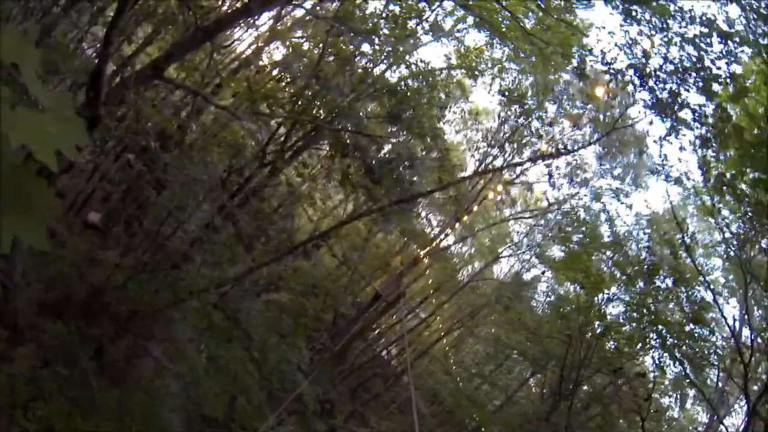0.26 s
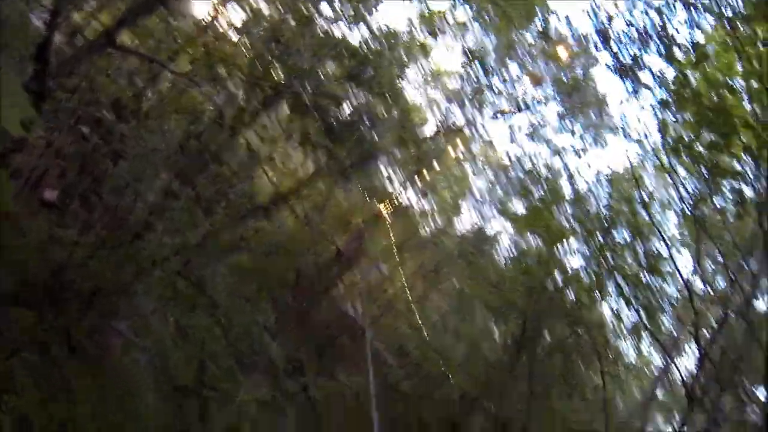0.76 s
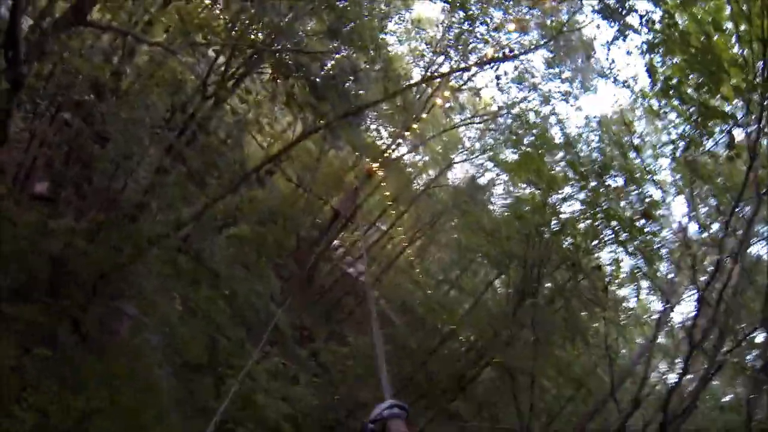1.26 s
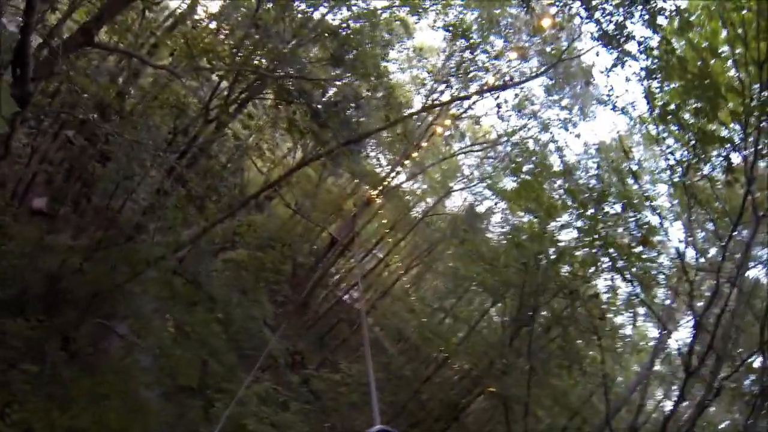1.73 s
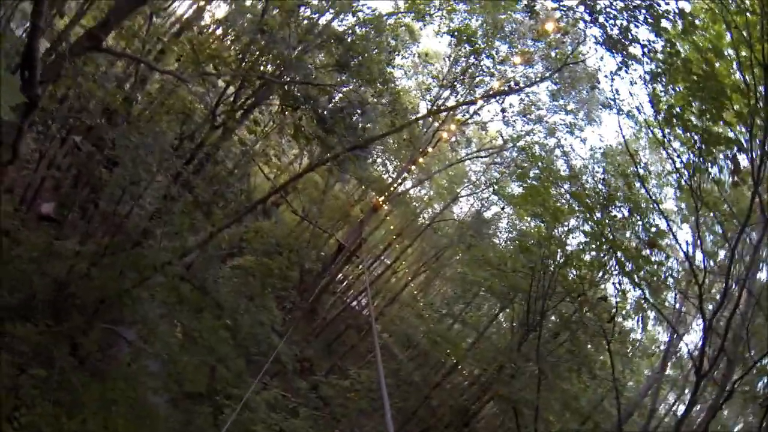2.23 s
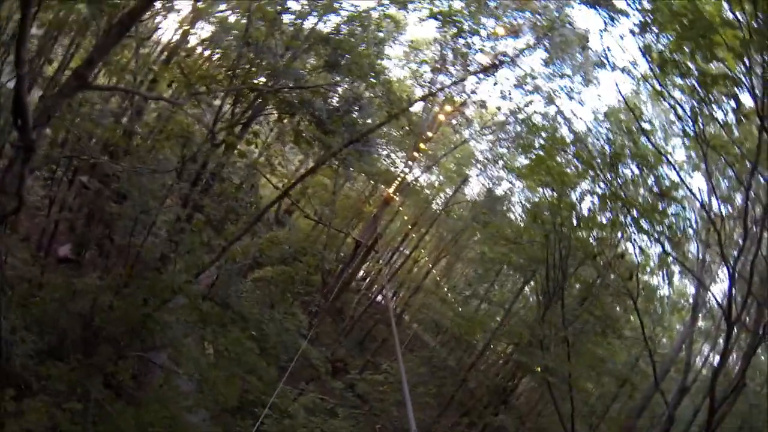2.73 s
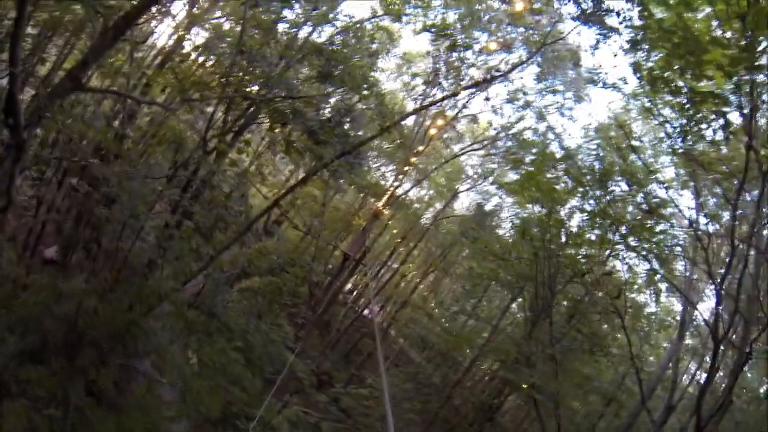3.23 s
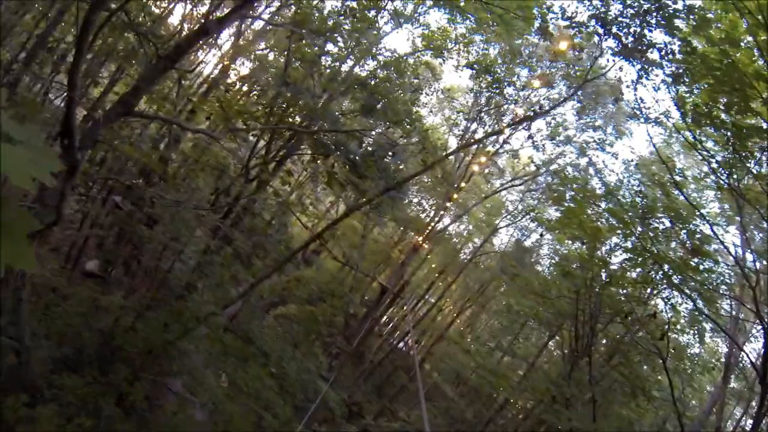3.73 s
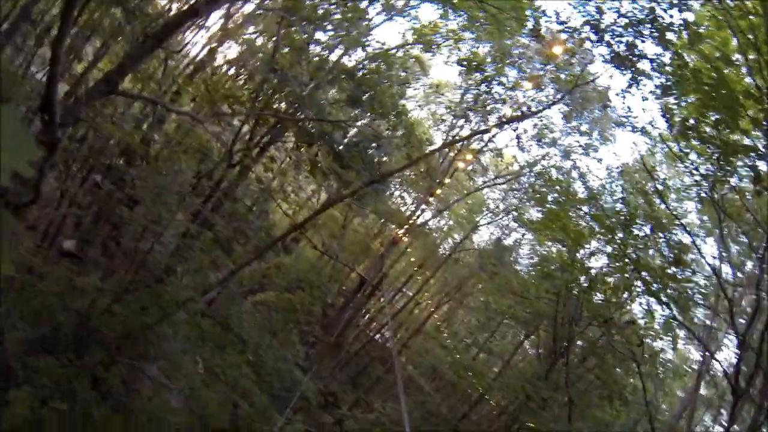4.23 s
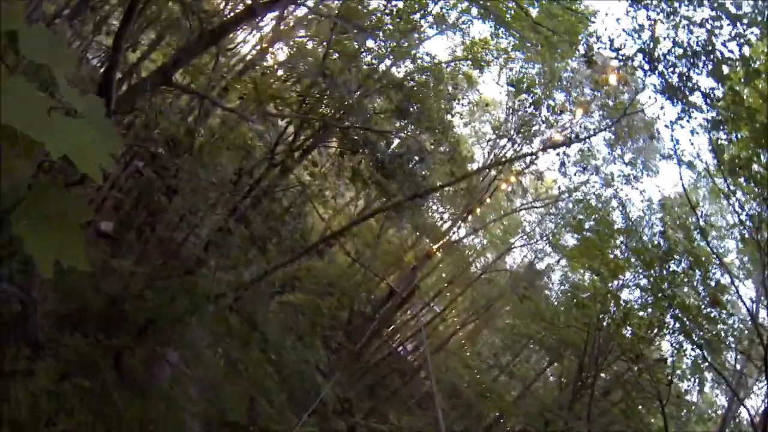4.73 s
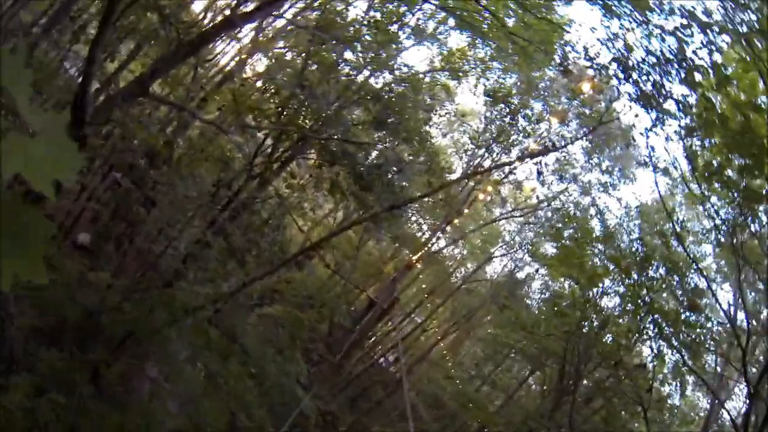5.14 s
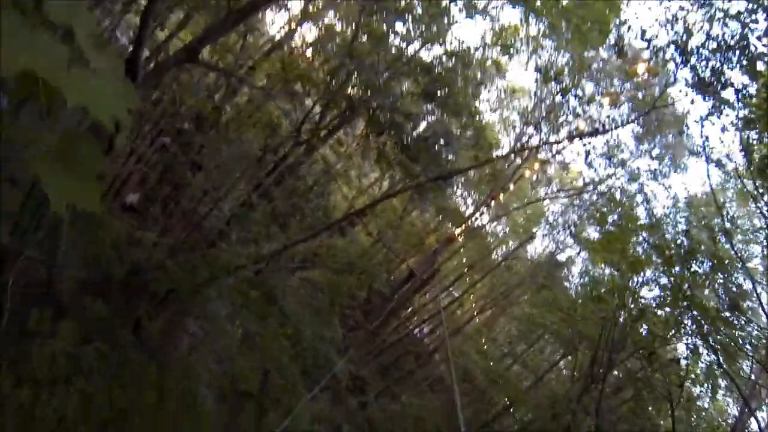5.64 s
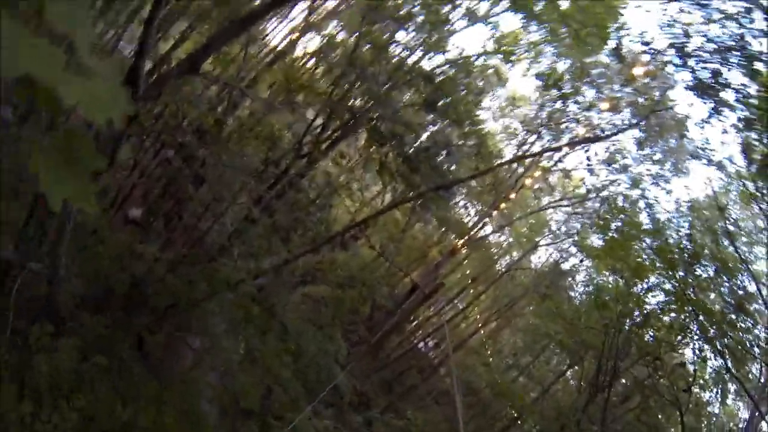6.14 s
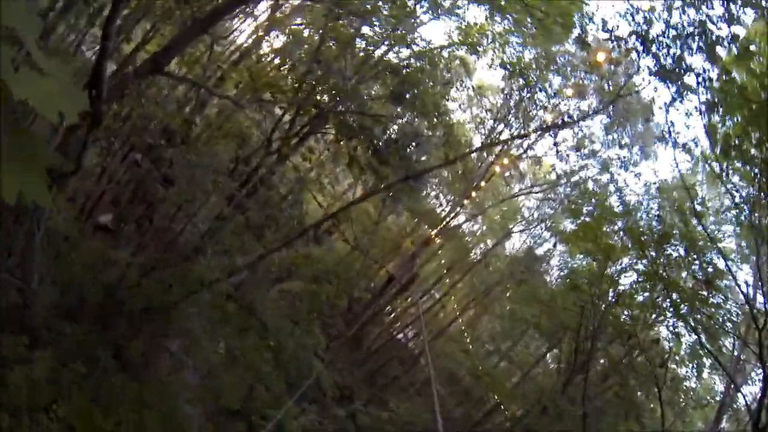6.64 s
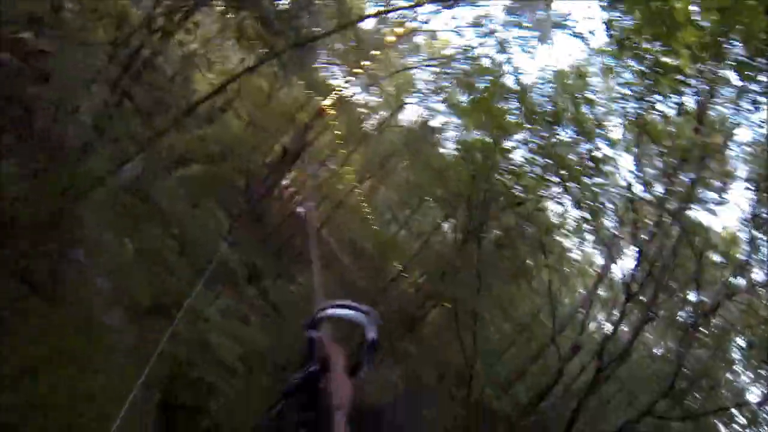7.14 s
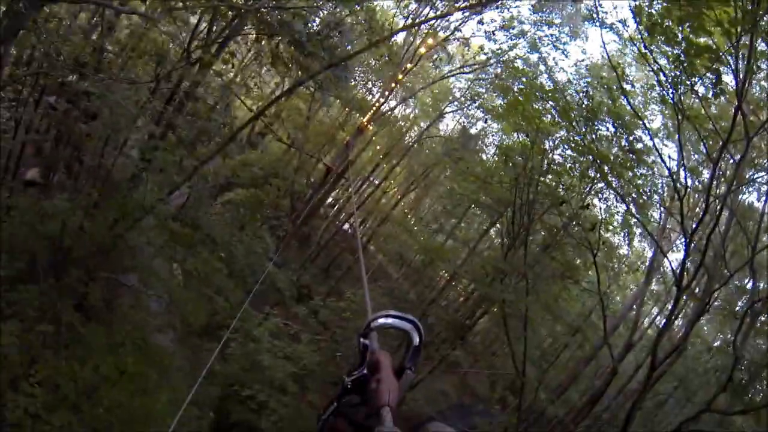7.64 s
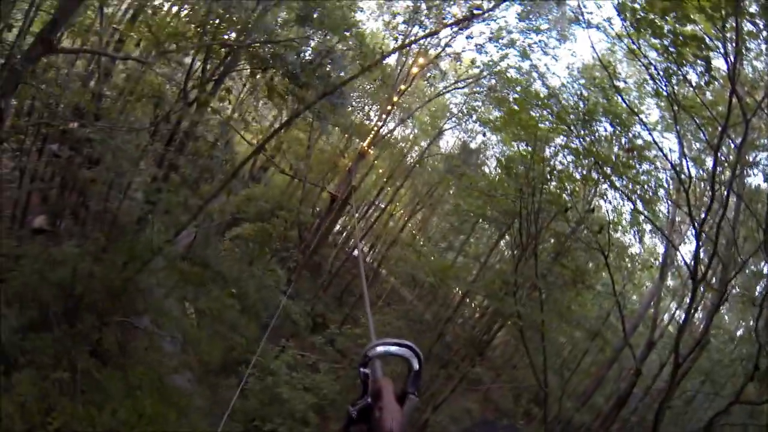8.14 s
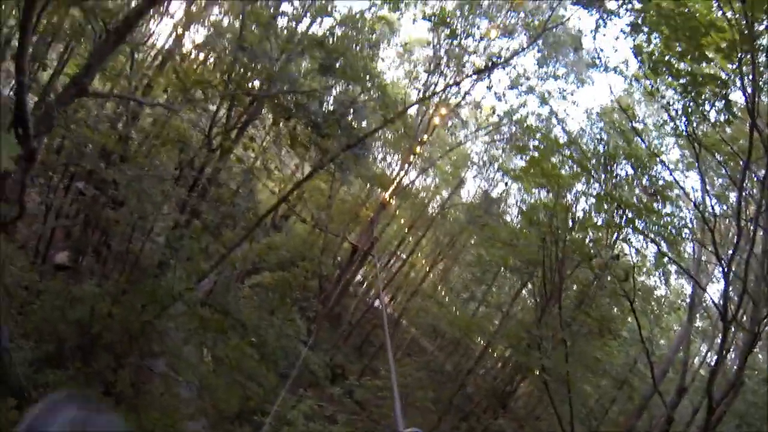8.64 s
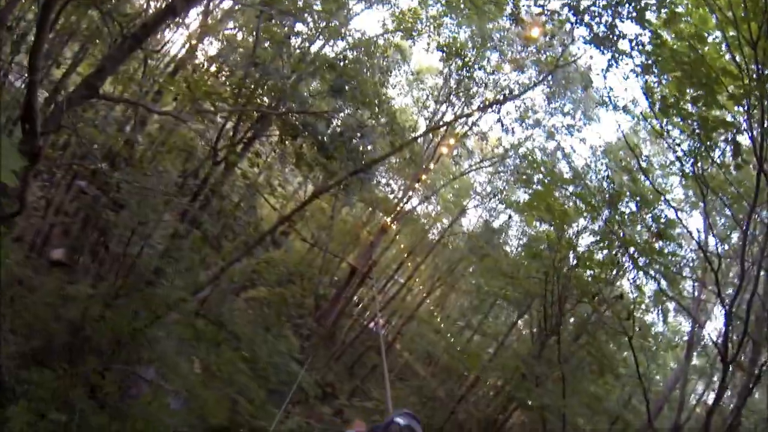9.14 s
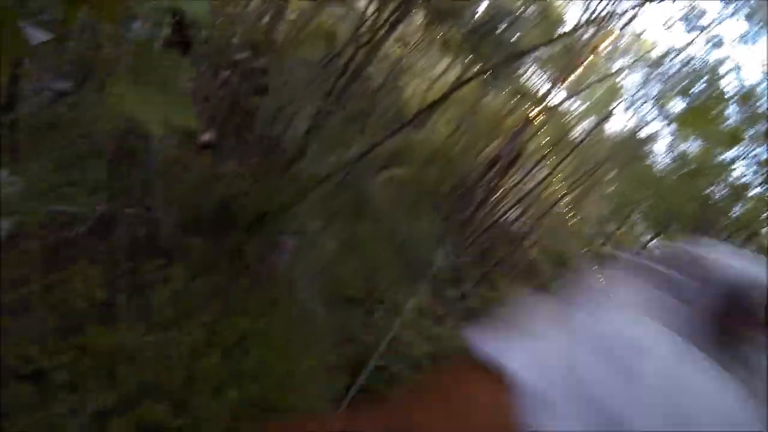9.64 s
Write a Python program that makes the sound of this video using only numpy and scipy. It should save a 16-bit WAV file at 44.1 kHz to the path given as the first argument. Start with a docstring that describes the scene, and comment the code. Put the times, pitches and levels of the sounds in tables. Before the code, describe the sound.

Heard from the rider's own microphone outdoors, low wind buffets in bursts beneath a soft rush of air. Steel wheels whir and hiss continuously on the cable, growing somewhat stronger after the first few seconds. Loose hardware ticks, pings and knocks, sparse in the middle; a short scraping tone rises before seven seconds, and sharp clicks finally crowd into a rattling cluster.

```python
"""A zip-line trolley whirs and hisses along a steel cable amid metallic clicks and rumbling wind.
Random wheel impacts excite two trolley resonances; fine grit and rough tones make the cable hiss and sing.
Hanging hardware clicks, pings and jingles as modal contacts; jolts thump the rig, faint whistles glide,
and airflow past the rider's microphone is shaped noise: gusty low eddies under a smooth rush."""
import sys
import numpy as np
from scipy import signal
from scipy.fft import rfft, irfft, next_fast_len
from scipy.io import wavfile
from scipy.ndimage import uniform_filter1d

SR = 44100
rng = np.random.default_rng(int(sys.argv[2]) if len(sys.argv) > 2 else 0)


def pcm_store(signal):
    """Save signal as 16-bit PCM."""
    levels = np.round(np.clip(np.atleast_2d(signal), -1, 1) * 32767)
    wavfile.write(sys.argv[1], SR, levels.astype(np.int16).T)


N = 436149
T = np.arange(N) / SR
LEAD_S = 0.003  # soft lead-in before the peak of a click

# wheel flange rubbing the cable: (time [s], pitch [Hz], rub level [dB], added whir [dB])
RUB = [(6.15, 3030, -99, 2), (6.3, 3205, -76, 2.5), (6.68, 3350, -72.5, -2.5), (6.79, 3500, -67, 8.5),
       (6.85, 3580, -98, 1), (6.95, 3480, -100, -1)]
# metal hardware resonances: (frequency [Hz], nominal width [Hz], relative level [dB])
HARDWARE = [(1530, 390, -0.5), (2178, 88, 12), (2604, 160, 14), (2996, 200, 13), (3240, 160, 5),
            (3660, 110, 9.5), (3950, 190, -0.5), (4960, 190, 1), (5510, 320, 4), (6460, 210, 2.5),
            (7060, 290, 2.5), (8320, 620, -0.5), (9630, 930, 0.5), (11700, 330, -14), (12400, 500, -6)]


def undb(db):
    """Decibels to amplitude gain."""
    return 10 ** (np.asarray(db) / 20)


def unit(x):
    """Scale to rms 1."""
    return x / np.sqrt(np.mean(x ** 2))


def curves(table):
    """Interpolate each column after the first over time."""
    time_s, *columns = np.transpose(table)
    return [np.interp(T, time_s, column) for column in columns]


def walk(rate_hz):
    """Smooth random wander, spread near 1, from twice-averaged random steps."""
    step = int(SR / rate_hz)
    steps = np.repeat(rng.standard_normal(N // step + 1), step)
    smooth = uniform_filter1d(uniform_filter1d(steps, step), step)
    return 1.39 * smooth[:N]


def colour(x, points):
    """Filter by a spectrum of (frequency [Hz], gain [dB]), linear in log frequency."""
    hz, db = np.transpose(points)
    size = next_fast_len(len(x))
    bin_hz = np.arange(size // 2 + 1) * SR / size
    gain = undb(np.interp(np.log(bin_hz + 1), np.log(hz), db))
    return irfft(rfft(x, size) * gain, size)[:len(x)]


def resonate(x, hz, width_hz):
    """One resonance, gain 1 at its centre."""
    b, a = signal.iirpeak(hz, hz / width_hz, fs=SR)
    return signal.lfilter(b, a, x)


def band(x, lo_hz, hi_hz, order=2):
    """Causal band-pass."""
    sos = signal.butter(N=order, Wn=[lo_hz, hi_hz], btype="band", fs=SR, output="sos")
    return signal.sosfilt(sos, x)


def patter(rate_per_s, spread_db):
    """Tiny impacts of random sign at random times, mostly weak and a few strong."""
    hit = rng.random(N) < rate_per_s / SR
    sign = rng.choice([-1, 1], N)
    strength_db = spread_db * np.minimum(rng.exponential(size=N), 4)
    return hit * sign * undb(strength_db)


def rough_tone(hz, width_hz):
    """A tone whose phase and strength friction keeps scrambling: noise-modulated quadrature carriers."""
    low_pass = signal.butter(2, width_hz / 2, fs=SR, output="sos")
    slow = signal.sosfilt(low_pass, rng.standard_normal((2, N)))
    phase = 2 * np.pi * np.cumsum(hz) / SR
    return unit(slow[0] * np.cos(phase) + slow[1] * np.sin(phase))


def singing(modes):
    """Rough tones summed over modes of (frequency [Hz], width [Hz], level [dB])."""
    return sum(undb(db) * rough_tone(np.full(N, hz), width_hz) for hz, width_hz, db in modes)


def struck_mode(hz, t60_s):
    """One struck steel mode: a pure note with exponential decay."""
    age = np.arange(SR // 3) / SR
    return np.sin(2 * np.pi * hz * age) * undb(-60 * age / t60_s)


def add(out, start_s, sound):
    """Mix a sound in at a time."""
    start = int(start_s * SR)
    out[start:start + len(sound)] += sound


def fade(start_s, attack_s, t60_s):
    """Envelope from a set time: a quick rise, then exponential decay."""
    out, age = np.zeros(N + 2 * SR), np.arange(SR) / SR
    add(out, start_s, (1 - np.exp(-age / attack_s)) * undb(-60 * age / t60_s))
    return out[:N]


def trolley(whir_db):
    """Wheels run over the wire strands; dense random impacts ring the trolley body."""
    strands = patter(rate_per_s=4500, spread_db=1.6)
    pressure_db = curves(RUB)[2]
    return trolley_body(strands) * undb(whir_db + pressure_db + 1.1 * walk(14))


def trolley_body(push):
    """The trolley's two main resonances, each a peak filter applied twice, in opposite signs."""
    # rolling trolley resonances: (frequency [Hz], width per pass [Hz], relative level [dB])
    whir_modes = [(1352, 240, 1.5), (1573, 248, -0.5)]
    body = 0
    for k, (hz, width_hz, db) in enumerate(whir_modes):
        once = resonate(push, hz, width_hz)
        body = body + (-1) ** k * undb(db) * resonate(once, hz, width_hz)
    return unit(body)


def cable(hiss_db):
    """Steel on steel: impacts hiss and ring the hardware; rough tones sing and a flange rubs."""
    # hiss spectrum: (frequency [Hz], relative level [dB])
    hiss_spectrum = [(1120, -36), (1900, -23), (2050, 1.5), (2560, -2), (3180, 0.5), (3440, -2),
                     (4140, -5.5), (4840, -7.5), (5430, -10.5), (7370, -11), (9420, -15.5), (12200, -18.5),
                     (14300, -31)]
    grit = patter(rate_per_s=9000, spread_db=3.0)
    hiss = unit(colour(grit, [(900, -31)] + list(hiss_spectrum)))

    tremor = patter(rate_per_s=3200, spread_db=5.0)
    metal = unit(sum(undb(db) * resonate(tremor, hz, width_hz * 0.66) for hz, width_hz, db in HARDWARE))
    metal = unit(colour(metal, [(1500, 7.0), (2800, -8.0), (6500, -24), (9000, -16), (14000, -40)]))
    friction = (undb(-2.5) * hiss + undb(-8.0) * metal) * undb(hiss_db + 0.5 * walk(10))
    return friction + cable_song() + flange_rub()


def cable_song():
    """Steel resonances sing under the wheels as two sets of rough tones, with a thin steady top note."""
    # singing levels: (time [s], first set gain [dB], second set gain [dB])
    sing_levels = [(0, -77.5, -80), (1.2, -77.5, -85), (1.7, -77.5, -85), (3, -79, -94), (5.5, -81, -90),
                   (7.5, -78.5, -87.5), (8.6, -75, -82), (9.89, -74, -78.5)]
    # steel resonances, two interleaved sets with their own levels: (frequency [Hz], width [Hz], relative level
    # [dB])
    first_set = [(5395, 890, 0), (7350, 1100, -6)]
    second_set = [(3630, 1300, 3.5), (6280, 670, 1.5), (8700, 550, -8.5)]
    first_db, second_db = curves(sing_levels)
    song = singing(first_set) * undb(first_db) + singing(second_set) * undb(second_db)
    top_note = rough_tone(np.full(N, 11300), width_hz=75)
    return song + top_note * undb(-97.5)


def flange_rub():
    """A wheel flange rubs the cable: a gliding rough tone plus fixed upper modes of the wheel."""
    # upper modes of the rubbed wheel: (frequency [Hz], width [Hz], relative level [dB])
    rub_modes = [(5280, 490, -6), (7200, 390, -7), (9750, 320, -15)]
    full_db = -75.5  # a harder rub no longer strengthens the upper modes
    rub_hz, rub_db, _ = curves(RUB)
    glide = rough_tone(rub_hz, width_hz=620) * undb(rub_db)
    return glide + singing(rub_modes) * undb(np.minimum(rub_db, full_db))


def hardware():
    """Carabiners and links click, rebound, ping and shiver; loose links jingle towards the end."""
    # clicks: (time [s], level [dB], clack over ring [dB], ring pitch [Hz], chatter t60 [s],
    #          knock relative to level [dB], sparkle relative to clack [dB])
    clicks = [(.1288, -45.5, -1, 3180, 0.015, 0, -3.5), (0.4152, -49, 2, 3940, .014, -8, -13),
              (.75, -43.5, 8, 3640, 0.031, 1.5, -7.5), (.7689, -53, 3, 3190, 0.018, 3, -9),
              (0.8385, -56, -18, 3220, 0.02, 10.5, -10), (.87, -64, -18, 3050, .025, 5, -10),
              (0.972, -57.5, -0.5, 3300, 0.032, 10, -10), (.981, -60, -4, 3100, 0.038, 7, -7),
              (1.1038, -49.5, -2, 3000, 0.02, -7, -12), (1.444, -60, -8, 3180, .028, -3, -12),
              (1.8278, -58.5, -11, 2950, 0.026, 2, -4), (2.042, -59, -13, 3050, .022, 0, -12),
              (2.1103, -53.5, -8, 2980, 0.019, -5, -9), (2.193, -59, -11, 2890, 0.022, 3, -8),
              (2.369, -47, -5.5, 2980, 0.015, -1, -10), (2.557, -52.5, -3, 2960, 0.019, 6, -5),
              (2.89, -56.5, -3, 3000, .028, -2, -11), (3.0585, -53.5, -2, 2560, 0.022, -6, -6),
              (3.131, -45, -1.5, 2900, 0.022, -1, -6), (3.1335, -37, -2.5, 2920, 0.022, 1.5, -12),
              (3.141, -46.5, -5, 2850, 0.028, 2, -7), (3.155, -53, -3, 2500, .02, 5, -7),
              (3.3695, -52.5, -6, 3300, 0.013, 12, -14), (3.707, -45.5, -4.5, 3000, 0.021, -2, -11),
              (3.936, -54.5, -2, 3180, 0.033, -1, -8), (4.105, -49.5, -2, 3520, 0.019, -3, -10),
              (4.2306, -59.5, -4, 3050, 0.024, -2, -8), (4.2688, -56, -6, 3300, .02, -2, -9),
              (4.532, -55, -7.5, 3340, 0.027, 4, -10), (4.553, -47, 7, 3100, 0.031, -0.5, -5),
              (4.575, -60, 4, 3060, .025, -6, -7), (4.818, -51.5, 6.5, 3020, .03, 4, -9),
              (4.832, -59.5, -3, 3060, .02, -1, -1.5), (4.9322, -59, 0, 3300, 0.014, 9, -10),
              (4.9681, -61, 7, 3300, 0.016, -4, -8), (6.0042, -52.5, -13, 3690, .012, -10, -11),
              (6.2959, -60.5, -8, 3200, .02, -2, -12), (6.596, -59.5, -11, 3200, .028, -8, -9),
              (6.648, -60, 2, 3400, .02, -2, -9), (6.933, -56.5, 8, 3450, .034, 0, -9),
              (6.946, -53.5, -16, 3200, 0.02, 2, -10), (7.5255, -53.5, -7, 3370, 0.013, 10, -12),
              (7.784, -56.5, 2, 3700, 0.027, -2, -16), (7.834, -54, -5, 3100, 0.022, -2, -8),
              (7.848, -43.5, 8.5, 2620, .036, -4.5, -13), (7.859, -57, 18, 3100, 0.021, -6, -17),
              (7.8837, -36, 3.5, 2540, 0.012, -3, -9), (8.028, -57, -7, 3250, 0.03, 7, -15),
              (8.118, -38.5, 3, 3750, 0.012, 0, -20), (8.1434, -54.5, 1, 2980, .02, 9, -13),
              (8.195, -55.5, 0, 3930, .02, 9, -8), (8.5375, -56.5, -9, 3500, .035, -6, -5),
              (8.5562, -39.5, -4, 3400, 0.023, -6, -9), (8.575, -54.5, -5, 3250, .04, 3, -9),
              (8.6123, -52, 1, 2640, 0.018, -2, -8), (8.853, -54, -9, 4150, .02, -4, -9),
              (9.059, -49, 2, 3305, 0.023, 0, -6), (9.172, -59, 12.5, 3300, .018, -1, -8),
              (9.2005, -54.5, 3, 2980, 0.026, 3, -10), (9.3, -53, 4, 2800, .014, -2, -7),
              (9.3059, -50.5, 5, 3220, .02, 2, -9), (9.329, -53, 3, 3500, .014, 0, -4),
              (9.356, -49.5, 5, 2570, .022, 0, -13), (9.3827, -47.5, 4, 3380, 0.0098, -2, -8),
              (9.4324, -41.5, -0.5, 3380, 0.024, -3, -13), (9.4687, -50.5, -8, 3250, .02, 0, -6),
              (9.4997, -50, 5, 3600, .02, 0, -5), (9.5035, -39.5, 4, 3730, 0.017, -1.5, -6),
              (9.5106, -40, 4.5, 3560, 0.025, -4, -11), (9.6256, -51, 1, 3700, .024, -2, -10),
              (9.638, -46, 12, 3740, 0.021, -4, -7), (9.674, -51, 5, 2830, 0.024, -6, -9),
              (9.7165, -60, -6, 2740, .018, -4, -11), (9.7509, -61, 0, 4100, .022, -6, -7),
              (9.7837, -50, 2, 2960, 0.021, -1, -15), (9.7932, -46.5, -7, 2940, 0.016, 4, -7)]
    # added ringing notes, most with the clicks, a few as faint ticks:
    # (time [s], pitch [Hz], level [dB], t60 [s])
    pings = [(.75, 5416, -41, 0.035), (3.3705, 5400, -49.5, .018), (0.416, 3820, -48.5, .022),
             (.87, 3070, -52, 0.041), (3.144, 3020, -38, .03), (3.229, 3070, -59, .04),
             (5.779, 3000, -61, .04), (7.849, 6430, -42, 0.037), (8.557, 11400, -39, 0.017),
             (8.557, 3530, -41, .035), (9.5112, 11200, -35, 0.021), (9.638, 4780, -41.5, 0.033),
             (9.7935, 6400, -54, .065), (6.005, 3700, -50, .02), (9.434, 3400, -44, .028),
             (9.4695, 3270, -44, .032)]
    # freely hanging carabiner modes: (frequency [Hz], relative level [dB], t60 [s])
    carabiner_modes = [(3130, -5.5, 0.096), (6340, -0.5, 0.085), (8500, -8, 0.062), (12460, -2, 0.032)]
    # blows on that carabiner: (time [s], level [dB])
    carabiner_blows = [(4.554, -50), (4.818, -57)]
    # loose-part notes: (time [s], pitch [Hz], level [dB], t60 [s])
    shivers = [(.88, 3080, -69, 0.64), (2.04, 3060, -69, 0.58), (6.94, 3030, -68, .8),
               (9.515, 11270, -69, .26)]
    # jingling spells: (start [s], length [s], touches per second [1/s], base level [dB])
    jingles = [(9.3, .48, 90, -64.5)]
    rebound_s, rebound_db = 0.016, -23.5  # mean delay; level against the click

    out = np.zeros(N + SR)
    for time_s, db, *tone in clicks:
        add(out, time_s - LEAD_S, click(db, *tone))
        add(out, time_s + rebound_s * (0.5 + rng.random()), click(db + rebound_db, *tone))
    for time_s, hz, db, t60_s in pings:
        add(out, time_s, undb(db) * struck_mode(hz, t60_s))
    for time_s, db in carabiner_blows:
        for hz, mode_db, t60_s in carabiner_modes:
            add(out, time_s, undb(db + mode_db) * struck_mode(hz, t60_s))

    mix = out[:N]
    for time_s, hz, db, t60_s in shivers:
        envelope = undb(db) * fade(time_s, attack_s=0.014, t60_s=t60_s)
        mix = mix + envelope * rough_tone(np.full(N, hz), width_hz=100)
    return mix + sum(jingle(*row) for row in jingles)


def click(db, bright_db, ring_hz, t60_s, knock_db, sparkle_db):
    """Two metal parts meet with a soft onset and chatter briefly; each contact favours other modes."""
    t = np.arange(SR // 3) / SR - LEAD_S
    age = np.maximum(t, 0)
    lead_in = undb(-33.0 + 16 * np.minimum(t, 0) / LEAD_S) * (t < 0)
    decay = undb(-60 * age / max(t60_s, 0.005)) + undb(-39.0 - 60 * age / 0.35)
    envelope = lead_in + decay * (1 - np.exp(-age / 0.00025))

    # uneven tiny impacts ring the modes and also crack directly into the air
    grain = undb(3 * np.repeat(rng.standard_normal(len(t)), SR // 2000)[:len(t)])
    chatter, crack = rng.standard_normal((2, len(t))) * grain * envelope
    luck = rng.standard_normal(len(HARDWARE))
    modes = 0
    for k, (hz, width_hz, mode_db) in enumerate(HARDWARE):
        gain = (-1) ** k * undb(mode_db + 4.2 * luck[k])
        modes = modes + gain * resonate(chatter, hz, width_hz * 0.8)
    sound = modes + undb(-5.0) * crack

    knock = unit(band(sound, 1370, 1690)) + undb(-8) * unit(band(crack, 490, 1320))
    ring_band = unit(band(sound, 2620, 3800))
    ring = unit(ring_band + undb(4.0) * unit(resonate(chatter, ring_hz, 160)))
    clack = unit(band(sound, 4190, 8140, order=5))
    sparkle = unit(band(sound, 9100, 14000))

    # brightness moves energy from the ring to the clack and sparkle
    ring_db, clack_db = -bright_db / 2, bright_db / 2
    mix = undb(knock_db) * knock + undb(ring_db) * ring
    mix += undb(clack_db - 0.5) * clack + undb(clack_db + sparkle_db) * sparkle

    # thin carabiner ring, near 3014 Hz, growing less than the blow does
    ring_on_hz = 3014 * (1 + 0.0088 * luck[0])
    ring_on = np.sin(2 * np.pi * ring_on_hz * age) * undb(-60 * age / 0.16)
    ring_on_db = -40.0 + 0.52 * (db + ring_db)
    return mix * undb(db) * np.sqrt(np.mean(envelope ** 2)) + ring_on * undb(ring_on_db)


def jingle(start_s, length_s, rate_per_s, db):
    """Loose links brush: many faint touches, a few firmer, each with its own colour and note."""
    out = np.zeros(N + SR)
    for when, strength, pitch, hardness, note in rng.random((int(length_s * rate_per_s), 5)):
        time_s = start_s + length_s * when
        touch_db = db + 8 * strength ** 2
        touch = click(touch_db, bright_db=-9 + 13 * hardness, ring_hz=2600 + 2200 * pitch,
                      t60_s=0.014, knock_db=-5.0, sparkle_db=-11)
        add(out, time_s, touch)
        link_hz = 2800 * 2 ** (2 * note)  # within two octaves
        add(out, time_s, undb(touch_db - 2) * struck_mode(link_hz, t60_s=0.037))
    return out[:N]


def jolts():
    """Jolts thump the rig as shaped noise, make it bounce at a low note and ring the trolley body."""
    # jolts: (time [s], rig thump level [dB], thump t60 [s], trolley ring level [dB])
    jolt_events = [(0.75, -50, 0.037, -39), (2.042, -57, 0.036, -45), (3.134, -44, 0.052, -38),
                   (3.37, -49, 0.045, -39), (4.107, -50, .03, -47), (4.818, -51.5, 0.067, -41),
                   (7.883, -53, 0.027, -48), (8.119, -64, 0.025, -52), (8.195, -49, 0.049, -53),
                   (8.576, -63, .035, -39), (9.504, -58, 0.045, -51)]
    # thump spectrum: (frequency [Hz], relative level [dB])
    thump_spectrum = [(40, -1), (100, 7.5), (170, 3), (300, -31), (450, -6.5), (700, -2.5), (950, -27),
                      (2000, -38)]
    bounce_hz, bounce_t60_s, bounce_db = 79.6, 0.32, 2.5  # level against the thump
    force, shake, bounce = np.zeros((3, N))
    for time_s, thump_db, t60_s, ring_db in jolt_events:
        force += undb(thump_db) * fade(time_s, attack_s=0.001, t60_s=t60_s)
        shake += undb(ring_db) * fade(time_s, attack_s=0.00051, t60_s=0.026)
        envelope = undb(thump_db + bounce_db) * fade(time_s, attack_s=0.0061, t60_s=bounce_t60_s)
        bounce += envelope * np.sin(2 * np.pi * bounce_hz * (T - time_s))
    thump = unit(colour(rng.standard_normal(N), thump_spectrum))
    return force * thump + bounce + shake * trolley_body(rng.standard_normal(N))


def whistles():
    """Faint gliding sines with a randomly wavering pitch swell and fade."""
    # whistles: (start [s], length [s], nominal start pitch [Hz], nominal end pitch [Hz], peak level [dB])
    whistle_events = [(4.414, 0.164, 1813, 1730, -61.5), (5.331, 0.175, 1012, 1133, -61.5)]
    out = 0
    for start_s, length_s, start_hz, end_hz, db in whistle_events:
        progress = np.clip((T - start_s) / length_s, 0, 1)
        glide_hz = start_hz + (end_hz - start_hz) * progress
        hz = glide_hz * (1 + 0.01407 * walk(90))
        out = out + undb(db) * np.sin(np.pi * progress) * np.sin(2 * np.pi * np.cumsum(hz) / SR)
    return out


def wind():
    """Low-frequency eddies buffet the microphone above a smooth rush of passing air."""
    # slowly varying airflow: (time [s], level before gain and flutter [dB])
    airflow = [(0.0, -41), (0.69, -40.5), (1.18, -46), (1.71, -44), (1.98, -47.5), (2.61, -51),
               (3.55, -42.5), (3.94, -45.5), (7.02, -38), (7.35, -47), (7.85, -44.5), (8.07, -49),
               (9.31, -41.5), (9.89, -43)]
    # single buffets: (peak time [s], level [dB])
    buffets = [(0.441, -28), (.52, -26), (0.789, -27), (.92, -31.5), (1.83, -35), (3.16, -36),
               (3.41, -30.5), (4.0, -31.5), (4.699, -33.5), (4.98, -33), (5.147, -26.5), (5.27, -35),
               (5.56, -32.5), (5.65, -36), (6.17, -33), (6.55, -30.5), (6.97, -28.5), (7.15, -31),
               (8.07, -34), (8.48, -35), (8.593, -27.5), (8.73, -34), (9.27, -34.5), (9.46, -38)]
    # eddy and rush spectra: (frequency [Hz], relative level [dB])
    eddy_spectrum = [(12, -16.5), (22, 0), (32, -2.5), (42, 2), (50, -2.5), (62, -13), (75, -20.5),
                     (100, -26), (140, -61), (300, -86)]
    rush_spectrum = [(110, 2), (170, -2.5), (250, -5.5), (450, -9.5), (800, -13), (1100, -12),
                     (1700, -12.5), (2400, -28), (8000, -42.5)]
    airflow_gain_db, flutter_db, flutter_hz = 3.5, 3, 22
    buffet_s = 0.027  # Gaussian 1/e half-width

    flow_db, = curves(airflow)
    flow = undb(flow_db + airflow_gain_db + flutter_db * walk(flutter_hz))
    swells = sum(undb(db) * np.exp(-((T - peak_s) / buffet_s) ** 2) for peak_s, db in buffets)
    gust = np.hypot(flow, swells)

    eddies = colour(rng.standard_normal(N), eddy_spectrum)
    eddies /= np.sqrt(uniform_filter1d(eddies ** 2, size=3000))  # level out, so the gusts set the strength
    buffeting = colour(eddies * gust, [(10, 0.5), (25, 0), (50, 2.0), (70, -4.0), (150, -10.5)])

    rush = unit(colour(rng.standard_normal(N), rush_spectrum))
    rush_db = -58.5 + 0.15 * (flow_db - flow_db.mean()) + 0.67 * walk(4.6)
    return buffeting + rush * undb(rush_db)


def scene():
    """Sum all sources at one microphone."""
    # ride, following speed and load: (time [s], whir level [dB], cable hiss level before gain [dB])
    ride = [(0.0, -64, -73), (4.02, -59, -70.5), (5.87, -60, -72), (6.2, -61, -71), (6.64, -55.5, -69.5),
            (7.1, -57, -71), (8.29, -58, -71.5), (9.28, -58, -69.5), (9.5, -57.5, -71), (9.89, -60, -72)]
    whir_db, hiss_db = curves(ride)
    rolling = trolley(whir_db) + cable(hiss_db + 2)
    return (rolling + hardware() + jolts() + whistles() + wind())[None]


def record(dry):
    """Steep elliptic low-pass removes the top of the spectrum."""
    low_pass = signal.ellip(8, 0.2, 70, 15200, fs=SR, output="sos")  # ripple [dB], stop band [dB], edge [Hz]
    return signal.sosfilt(low_pass, dry)


dry = scene()
out = record(dry)
pcm_store(out)
```